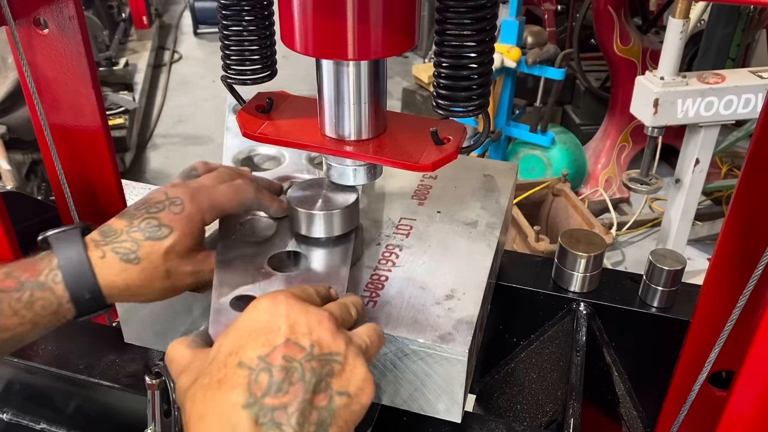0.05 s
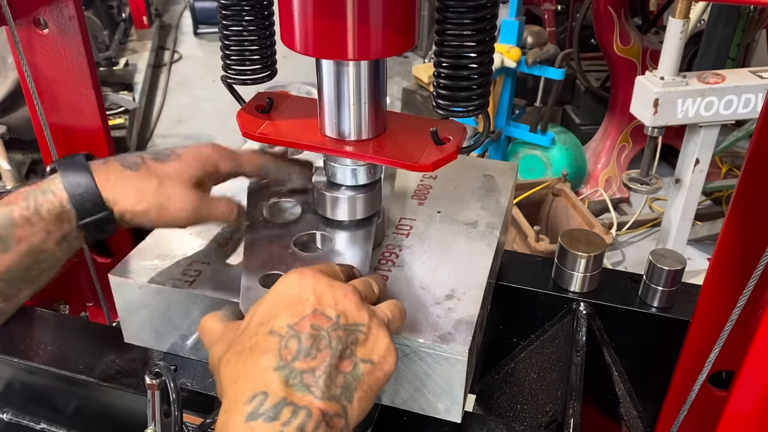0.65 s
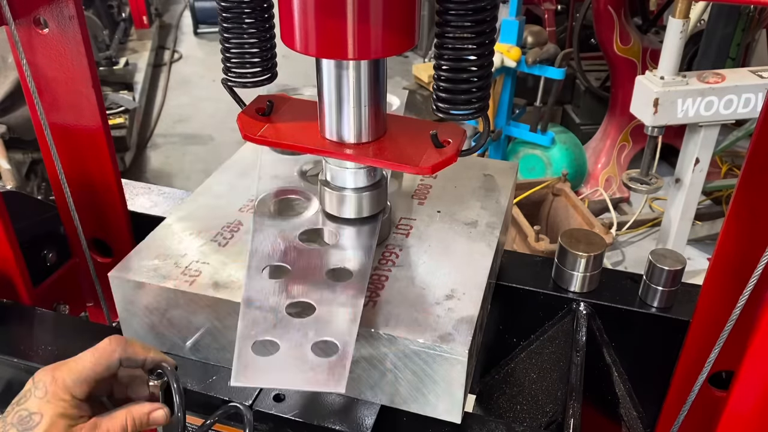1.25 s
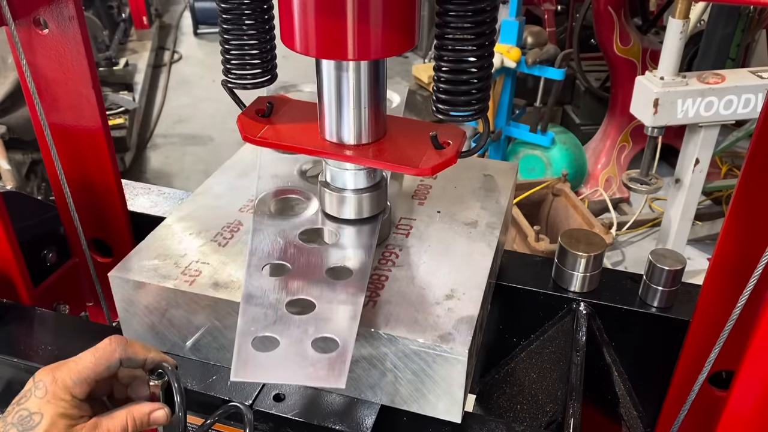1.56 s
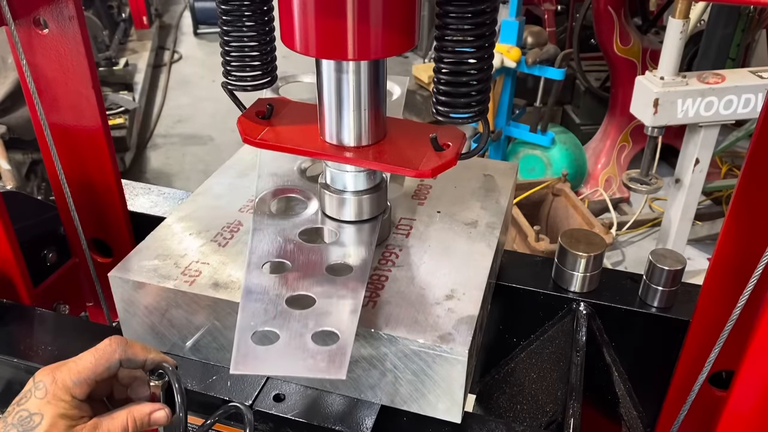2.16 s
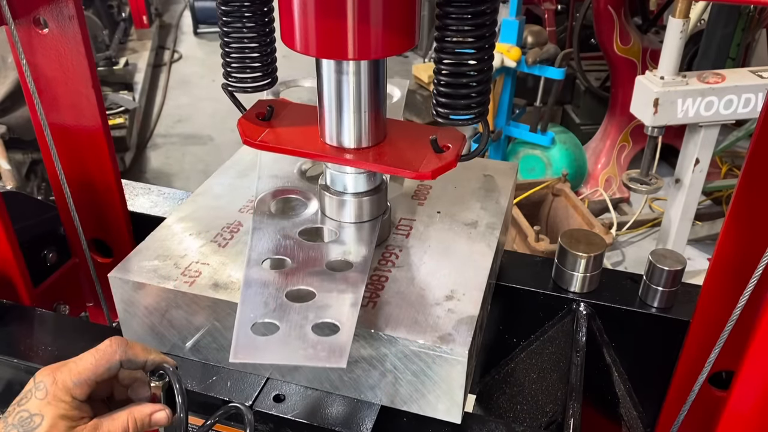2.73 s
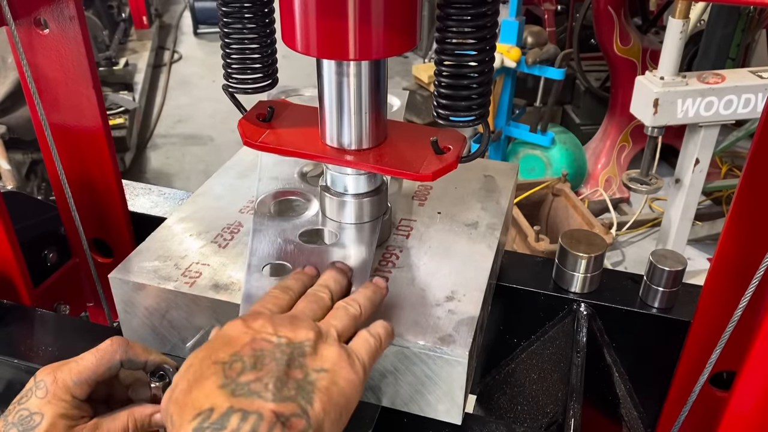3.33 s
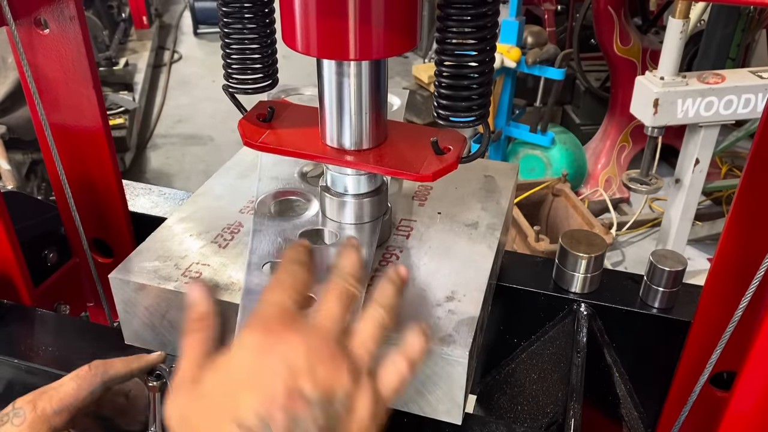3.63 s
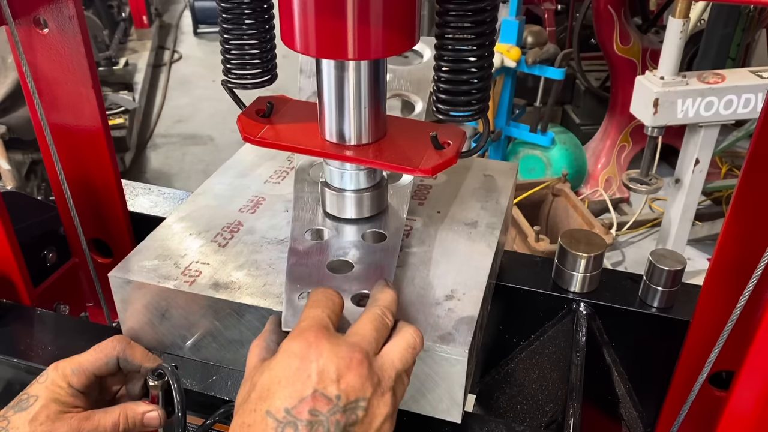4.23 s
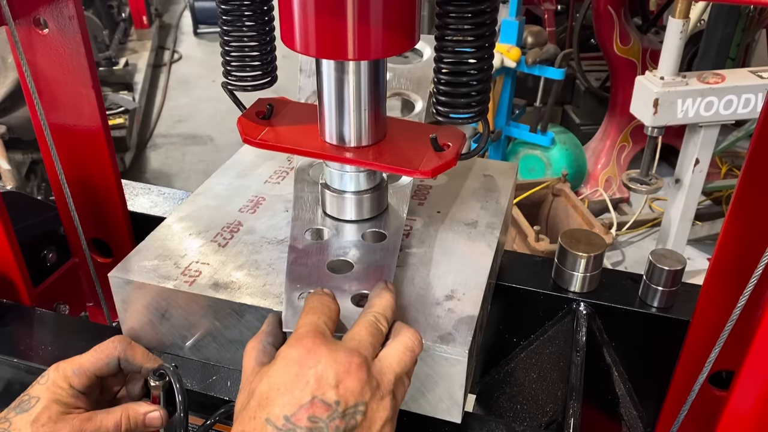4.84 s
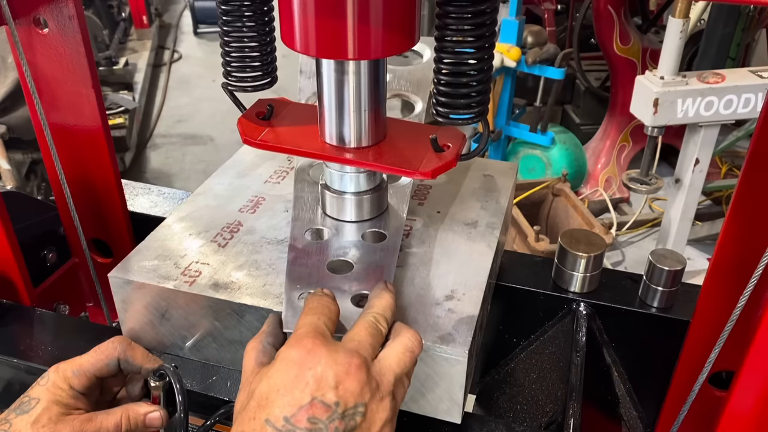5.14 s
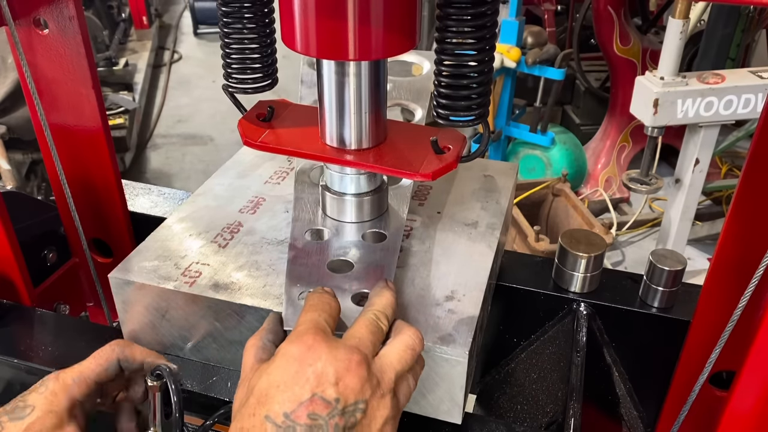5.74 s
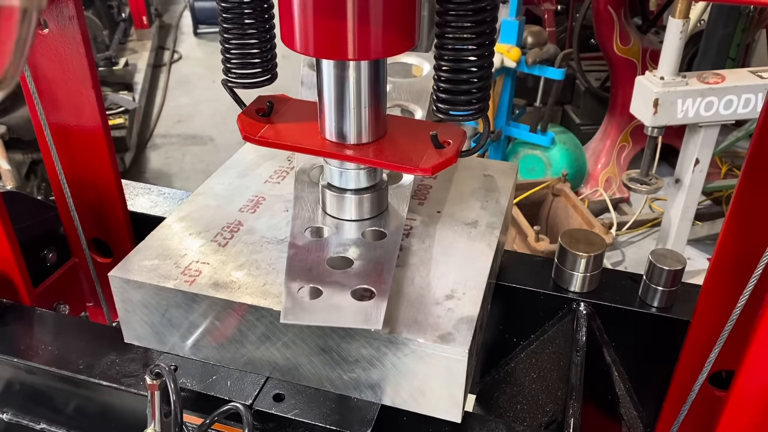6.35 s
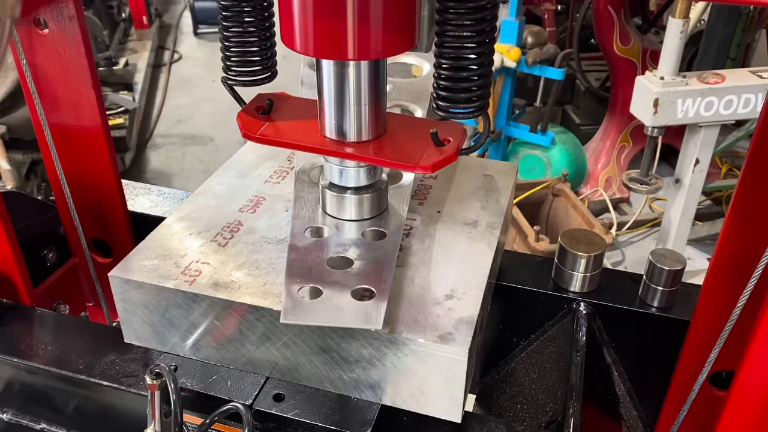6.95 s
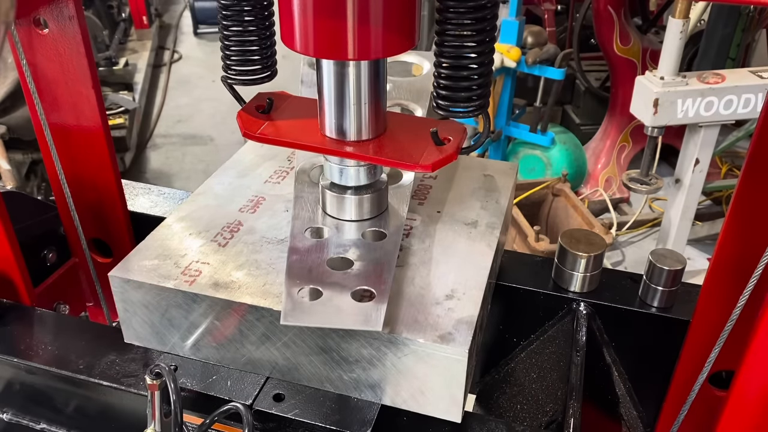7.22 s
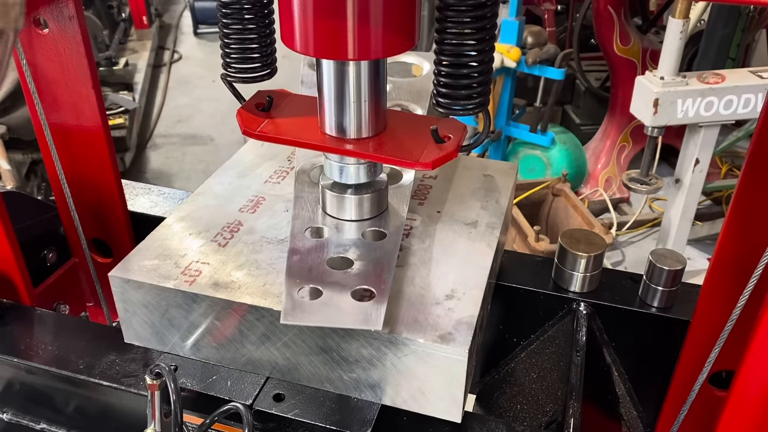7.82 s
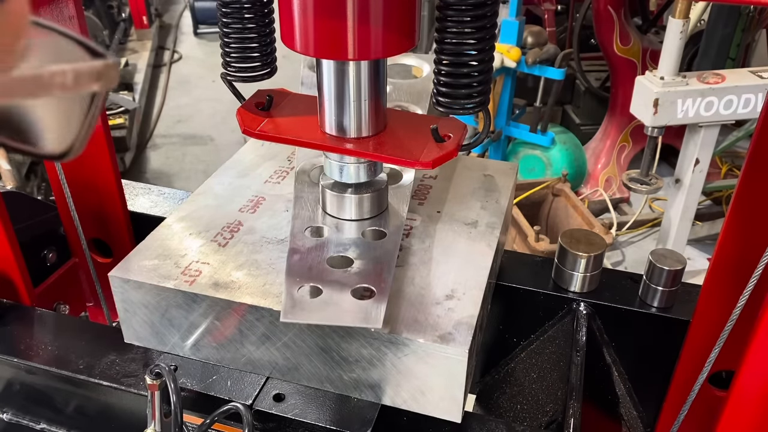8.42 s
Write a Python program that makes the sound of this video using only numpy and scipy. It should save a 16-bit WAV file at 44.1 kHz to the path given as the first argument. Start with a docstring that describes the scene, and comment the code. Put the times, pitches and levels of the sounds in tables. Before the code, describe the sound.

A steel die clinks close by in a workshop, over a low fan rumble. An air-driven hydraulic pump then runs twice, about two seconds each time, in a rapid rattle of knocks, valve clacks and hissing exhaust puffs slightly to the left. Each run slows as the press takes load, with a short room echo. Afterwards the fan remains, with a few dull bumps and a very faint whistle of oil.

```python
"""A workshop, in stereo, close to a hydraulic press, with a fan rumbling and whining behind it.
A steel die clinks under the ram, then an air-driven pump runs twice, slowing as the load builds.
Each stroke knocks the pump body, rings its casing, clacks an oil valve and lets out a puff of exhaust
air, a little left of centre, that echoes through the shop. Dull bumps come now and then, and the level
dips briefly three times. Afterwards oil whistles faintly through the release valve as the ram returns."""
import sys
import numpy as np
from scipy import signal
from scipy.fft import rfft, irfft, next_fast_len
from scipy.io import wavfile

SR = 44100
rng = np.random.default_rng(int(sys.argv[2]) if len(sys.argv) > 2 else 0)


def unload_audio(sound):
    """Save the sound as a 16-bit wav file, at the path given as the first command line argument."""
    columns = np.transpose(np.atleast_2d(sound))
    # keep every value between -1 and 1, then stretch to whole-number steps
    steps = np.round(np.clip(columns, -1, 1) * 32767)
    wavfile.write(sys.argv[1], SR, steps.astype(np.int16))


N = 373957


def undb(db):
    """Decibels to gain."""
    return 10 ** (np.asarray(db) / 20)


def unit(x):
    """Scale to rms 1."""
    return x / np.sqrt(np.mean(x ** 2))


def clock(seconds=N / SR):
    """Sample times in seconds."""
    return np.arange(int(round(seconds * SR))) / SR


def add(out, s, sound):
    """Mix a sound, or a single impulse, in at time s."""
    i, sound = int(s * SR), np.atleast_1d(sound)
    out[..., i:i + sound.shape[-1]] += sound[..., :N - i]


def convolve(x, response):
    """Pass a sound through a response of one or two channels."""
    return signal.oaconvolve(np.atleast_2d(x), np.atleast_2d(response), axes=-1)[:, :N]


def cut(x, kind, hz, order=2):
    """Butterworth lowpass or highpass."""
    return signal.sosfilt(signal.butter(order, hz, kind, fs=SR, output="sos"), x)


def curve(points, size):
    """Join (f/Hz, value) points on a log-frequency axis, one value per FFT bin."""
    hz, values = np.transpose(points)
    return np.interp(np.log(np.fft.rfftfreq(size, 1 / SR) + 1), np.log(hz), values)


def colour(points, peaks=(), size=4096):
    """Minimum-phase response of unit energy with the given spectrum and resonant peaks."""
    f = np.fft.rfftfreq(size, 1 / SR)
    lift_db = sum(db / (1 + (2 * (f - hz) / width) ** 2) for hz, width, db in peaks)
    cepstrum = irfft(np.log(undb(curve(points, size) + lift_db)))
    cepstrum[1:size // 2] *= 2
    cepstrum[size // 2 + 1:] = 0
    response = irfft(np.exp(rfft(cepstrum)))
    return response / np.linalg.norm(response)


def ring(modes, seconds, ratio=1):
    """Modes struck once, unit energy; mode k is weighted ratio ** k, so a negative ratio alternates."""
    t = clock(seconds)
    y = sum(ratio ** k * undb(db - 60 * t / t60) * np.sin(2 * np.pi * hz * t)
            for k, (hz, db, t60) in enumerate(modes))
    return y / np.linalg.norm(y)


def noise(side_db):
    """Mid-side white noise; more side makes it wider."""
    mid, side = rng.standard_normal((2, N))
    return unit(mid + undb(side_db) * np.array([side, -side]))


def tone(hz, width_hz):
    """A wavering tone: a band of noise, rms 1."""
    size = next_fast_len(N)
    f = np.fft.rfftfreq(size, 1 / SR)
    band = rfft(rng.standard_normal(size)) / (1 + (2 * (f - hz) / width_hz) ** 2)
    return unit(irfft(band, size)[:N])


def reflections(t60_low, t60_high, gap_s):
    """Dense echoes of unit energy at each microphone, with separate decays below and above 8 kHz."""
    t = clock(.7)
    echoes = rng.standard_normal((2, len(t)))
    low = cut(echoes, "lowpass", 8000) * undb(-60 * t / t60_low)
    high = cut(echoes, "highpass", 8000) * undb(-60 * t / t60_high)
    tail = (low - high) * (1 - np.exp(-(t / gap_s) ** 2))
    return tail / np.linalg.norm(tail, axis=1, keepdims=True)


def pan(x, left_db):
    """Make a sound louder at the left microphone than at the right."""
    return x * undb(np.array([[1], [-1]]) * left_db / 2)


def place(x, levels, phases):
    """Give a sound level and phase differences between the microphones that vary with frequency."""
    size = next_fast_len(N)
    half = np.sqrt(undb(curve(levels, size))) * np.exp(.5j * curve(phases, size))
    return irfft(rfft(x, size) * np.array([half, 1 / half]), size)[:, :N]


def air(spectrum, since_s, rumble_db, hiss_db, rumble_db_per_s=1.5, hiss_db_per_s=1.8):
    """Fan-stirred air: a buffeting, central rumble under a wide hiss; both grow slowly from since_s."""
    t = clock() - since_s
    rumble = cut(convolve(noise(side_db=-10), colour(spectrum)), "lowpass", 350)
    hiss = cut(convolve(noise(side_db=-2.5), colour(spectrum)), "highpass", 376)
    hiss = cut(hiss, "lowpass", 10300, order=10)
    buffet_db = tone(3.2, 26)
    return (unit(rumble) * undb(rumble_db + rumble_db_per_s * t + buffet_db)
            + unit(hiss) * undb(hiss_db + hiss_db_per_s * t))


# room tone before, during and after the pumping: f/Hz, relative level/dB
AIR_BEFORE = [(12, -43), (20, -13), (66, -2.5), (114, -5), (179, -20), (463, -15.5), (969, -22),
              (1370, -18.5), (1690, -24.5), (2200, -24), (8010, -36), (9390, -36), (11000, -54),
              (14300, -91), (22000, -120)]
AIR_DURING = [(25, -41), (42, -18), (65, -13), (130, 5), (250, -6), (400, -8), (900, -10.5), (1500, -18),
              (2300, -20), (2750, -18.5), (3300, -21.5), (8000, -30), (15000, -35)]
AIR_AFTER = [(12, -24), (20, -18), (66, -7.5), (124, -13), (239, -28.5), (303, -20), (375, -24.5),
             (406, -20.5), (944, -29), (1240, -27.5), (1370, -22.5), (1690, -33), (1900, -31),
             (2900, -33.5), (3500, -36.5), (6150, -38.5), (11000, -47), (14300, -100), (22000, -120)]
# fan and motor tones, centred between the microphones: f/Hz, width/Hz, level/dB
FAN_WHINE = [(1353, 9, -71.5), (1397, 30, -67)]
MOTOR_HUM = [(67.3, 3.6, -56.5), (132.3, 31, -49.5), (233.3, 6.6, -53), (2650, 20, -75), (2805, 62, -68)]


def workshop(during_db=-49, early_whine_db=6):
    """Behind the press: fan rumble and whine; the scene changes at the first and at the last dip, with motor
    hum in place of the fan between them."""
    t = clock()
    whine = sum(undb(db) * tone(hz, width) for hz, width, db in FAN_WHINE)
    hum = sum(undb(db) * tone(hz, width) for hz, width, db in MOTOR_HUM)
    during = hum + undb(during_db) * convolve(noise(side_db=-7), colour(AIR_DURING))
    before = air(AIR_BEFORE, 0, rumble_db=-39.5, hiss_db=-47.5) + undb(early_whine_db) * whine
    after = air(AIR_AFTER, DIPS[-1], rumble_db=-46.5, hiss_db=-56) + whine
    return np.where(t < DIPS[0], before, np.where(t > DIPS[-1], after, during))


def late_hiss(start_s=7.68, rise_s=.44, level_db=-58):
    """A wide background hiss, strongest around 900 Hz, swells near the end."""
    band = colour([(400, -31.5), (900, 6), (1500, -6), (2900, -3),
                   (4200, -13), (9000, -26), (12000, -58)])
    rise = np.clip((clock() - start_s) / rise_s, 0, 1)
    return undb(level_db) * rise * convolve(noise(side_db=-3), band)


# soft low bumps in the shop: t/s, level/dB, mean f/Hz
BUMPS = [(0.666, -27.5, 61), (0.997, -25.5, 61.6), (1.694, -27, 159.7), (3.891, -31, 160),
         (3.948, -29.5, 144), (4.54, -29.5, 152), (4.68, -25, 136), (5.848, -35.5, 173),
         (6.105, -31.5, 195), (6.138, -31.5, 143), (6.308, -36, 75), (7.026, -31.5, 109), (8.199, -40, 150)]


def bumps(length_s=.0387, thud_db=-3, rustle_db=-2, sag=.51):
    """Dull bumps: a few low cycles that sink in pitch, with a soft rustle."""
    thuds, touch = np.zeros((2, N))
    t = clock(length_s)
    for s, db, hz in BUMPS:
        swell = undb(db) * np.sin(np.pi * t / length_s)
        turns = hz * t * (1 + sag * (1 - t / length_s))
        add(thuds, s, swell * np.sin(2 * np.pi * turns))
        add(touch, s, swell * hz ** 2 / (hz ** 2 + 130 ** 2))  # higher bumps rustle more
    band = colour([(40, -16), (110, 2.5), (220, 3), (500, -10), (800, -37), (3000, -50), (12000, -70.5)])
    rustle = convolve(noise(side_db=-9.5), band)
    return undb(thud_db) * thuds + undb(rustle_db) * touch * rustle


# faint oil whistles, dead centre: start t/s, end t/s, f/Hz, width/Hz, level/dB
WHISTLES = [(6.2, 6.85, 6180, 110, -69), (6.6, 7.8, 4880, 160, -75), (5.6, 7.9, 5250, 550, -73),
            (7.55, 8.12, 4700, 620, -68)]


def release_valve():
    """Oil squeezes back through the valve as the springs lift the ram; each whistle swells and fades."""
    t, out = clock(), np.zeros(N)
    for start, end, hz, width, db in WHISTLES:
        from_middle = (2 * t - start - end) / (end - start)
        arch = np.sqrt(np.clip(1 - from_middle ** 2, 0, 1))
        out += undb(db) * arch * tone(hz, width)
    return out


# the die meeting the ram, nearest the microphones: t/s, level/dB, contact decay/s
CLINKS = [(0.5697, -18.5, 0.0014), (0.574, -33, .002), (0.5783, -36, .002), (.5865, -42, .002)]
# modes of the die and plate: f/Hz, relative level/dB, t60/s
DIE_MODES = [(1051, -13, 0.065), (1224, -3, .07), (1400, -16, .06), (1930, -10, 0.099), (3080, -1, 0.076),
             (3418, -22, 0.073), (3887, -3, .034), (4260, 2, 0.037), (5040, -8, .018), (5496, -10, .05),
             (6336, 2, 0.032), (6640, -4, .025), (7160, -7, .035)]
# crack of contact and bright scrape: f/Hz, relative level/dB
CRACK = [(200, -26), (450, -14), (1100, 3), (2000, 2), (4300, 4), (6800, -1.5), (8800, -11), (10300, -5),
         (12000, -35), (16000, -36)]
SCRAPE = [(1000, -22), (4600, -15), (5200, -7), (5480, 3), (5750, -6), (6400, -5), (7200, -12),
          (10000, -32), (14000, -60)]


def die(ring_db=17, scrape_at_s=.622, scrape_length_s=.028, scrape_db=-45):
    """Steel knocks on steel, chatters and slides home."""
    contact, blows, slide = np.zeros((3, N))
    t = clock(.06)
    for s, db, decay_s in CLINKS:
        add(contact, s, undb(db) * np.exp(-t / decay_s))
        add(blows, s, undb(db))
    add(slide, scrape_at_s, undb(scrape_db) * np.hanning(int(scrape_length_s * SR)))
    grit = noise(side_db=-8)
    crack = convolve(contact * grit, colour(CRACK))
    scrape = convolve(slide * grit, colour(SCRAPE))
    scatter = convolve(crack, reflections(t60_low=.11, t60_high=.027, gap_s=.00099))
    ringing = cut(convolve(blows, ring(DIE_MODES, .4)), "lowpass", 9700)
    return crack + scrape + scatter + undb(ring_db) * ringing


# modes of the pump casing, toward the left microphone: f/Hz, relative level/dB, t60/s
CASING_MODES = [(802, -8, .4), (829, 0, .15), (866, -14, .1), (1168, -9, .22), (1195, -4, .16),
                (1222, -12, .12)]


def casing(events, free_db=-14.3, load_db=-10, strain_load=.018, rise=.018, fall=.14, scatter=.012):
    """Strokes ring the casing, loudest when a multiple of their rate meets a note; strain bends it."""
    out = np.zeros(N)
    t, note = clock(.4), ring(CASING_MODES, .4, ratio=-1.07)
    for s, load in events:
        waver, force_db = rng.standard_normal(2)
        strain = np.clip(load / strain_load, 0, 1) ** 2
        pitch = 1 + strain * (rise - fall * load + scatter * waver)
        bent = np.interp(t * pitch, t, note, right=0)
        add(out, s, undb(free_db + load_db * load + force_db) * bent)
    return pan(out, left_db=4.5)


def pressure_pulse(points, spread_s=.0045, size=2048):
    """A pulse of unit energy, centred in its length and spread by the steel: low notes travel slower."""
    hz = np.fft.rfftfreq(size, 1 / SR)
    turns = spread_s * (2 * np.sqrt(300 * hz) - hz)
    spectrum = undb(curve(points, size)) * np.exp(-2j * np.pi * turns)
    pulse = np.fft.fftshift(irfft(spectrum)) * np.hanning(size)
    return pulse / np.linalg.norm(pulse)


LABOUR_LOAD, WANDER_S = .07, .0007  # load at which the knock has fully changed; jitter per unit load
# piston knock, running free and against high oil pressure: f/Hz, relative level/dB
FREE_KNOCK = [(45, -52), (108, -14), (144, -3), (180, -6), (216, -10), (252, 0.5), (288, 2.5), (324, -3),
              (360, -7), (432, -5), (468, -14), (504, -7), (540, -17), (660, -25.5), (760, -34.5),
              (1050, -47), (1700, -21), (3000, -23), (8000, -56)]
LOADED_KNOCK = [(45, -44.5), (90, -16), (140, 2.5), (195, -9), (245, -0.5), (282, 1.5), (335, -12),
                (395, -1), (450, -13), (515, -7), (580, -24), (760, -32), (3000, -45), (8000, -64)]
# modes of the pump body and the press frame: f/Hz, relative level/dB, t60/s
BODY_MODES = [(1286, 0, 0.057), (1358, 2.5, 0.054), (1418, 7.5, 0.08), (2680, 6.5, 0.1)]
FRAME_MODES = [(143, -7, .12), (245, -0.5, .17), (284, 1.5, 0.16), (400, 0.5, 0.1), (512, -2.5, .08)]


def piston(events, free_db=-7, loaded_db=-9.5, frame_db=-11, body_db=-14, body_load_db=-20,
           recoil_s=.0079, recoil=.36, lag_s=.004):
    """The piston thumps, recoils and rings the body; under load the recoil fades and the frame drones."""
    free, loaded, rattle = np.zeros((3, N))
    for s, load in events:
        jitter, force_db, scatter_db = rng.standard_normal(3)
        s += WANDER_S * load * jitter
        blow = undb(.54 * force_db)
        labour = np.clip(load / LABOUR_LOAD, 0, 1)
        add(free, s, blow * (1 - labour))
        add(free, s + recoil_s, -blow * (1 - labour) * recoil * undb(scatter_db))
        add(loaded, s, blow * labour * undb(.91 * scatter_db))
        add(rattle, s, blow * undb(body_load_db * load))
    free_pulse, loaded_pulse = pressure_pulse(FREE_KNOCK), pressure_pulse(LOADED_KNOCK)
    thump = undb(free_db) * convolve(free, free_pulse) + undb(loaded_db) * convolve(loaded, loaded_pulse)
    thump = np.roll(thump, int(lag_s * SR) - len(free_pulse) // 2, axis=1)  # centred lag_s after the blow
    drone = undb(frame_db) * convolve(loaded, ring(FRAME_MODES, .3))
    body = undb(body_db) * convolve(rattle, ring(BODY_MODES, .28))
    return cut(thump + drone + body, "highpass", 70)


# clack of the oil valve, near the centre: f/Hz, relative level/dB
CLACK = [(300, -27), (580, 0), (950, -4.5), (1100, -18.5), (1300, -1.5), (1700, -3), (2300, 2.5), (2650, 1),
         (3000, 1), (4000, -6.5), (6000, -6.5), (10000, -35)]


def oil_valve(events, clack_db=-10, load_db=10, shut_s=.0105, late_s=.034, ring_db=-11):
    """The valve clacks shut after each blow; under load it shuts later and harder and rings the body."""
    clacks, slams = np.zeros((2, N))
    for s, load in events:
        force_db, jitter = rng.standard_normal(2)
        when = s + shut_s + load * (late_s + WANDER_S * jitter)
        add(clacks, when, undb(clack_db + load_db * load + force_db))
        add(slams, when, undb(ring_db + force_db) * np.clip(load / LABOUR_LOAD, 0, 1))
    mid, side = reflections(t60_low=.12, t60_high=.059, gap_s=.000291)  # dense metallic ring
    clack = convolve(colour(CLACK), mid + undb(-14) * np.array([side, -side]))
    return convolve(clacks, clack) + convolve(slams, ring(BODY_MODES, .28))


# air leaking as the valve opens, just before each run: t/s, length/s, level/dB
LEAKS = [(1.283, 0.047, -37), (3.827, 0.054, -28.5)]


def exhaust_port(events, lag_s=.00038, open_s=.0011, vent_s=.015, spit_s=.0053,
                 puff_db=-20.5, load_db=7, seep_db=-12.5, spit_db=-4):
    """Envelopes of airflow and spit: the port snaps open, the cylinder empties, and some air seeps on."""
    power, spit = np.zeros((2, N))
    t = clock(.045)
    seep = undb(puff_db + seep_db) ** 2 * np.hanning(len(t))
    spit_shape = np.sqrt(t / spit_s) * np.exp((1 - (t / spit_s) ** 2) / 4)
    for s, load in events:
        fill, stickiness, sharpness = rng.standard_normal(3)
        # under load the cylinder fills to a higher pressure: it opens faster and vents harder
        pressure = undb(puff_db + load_db * load + .36 * fill)
        opening = 1 - np.exp(-t / (open_s * np.exp(.22 * stickiness - 2 * load)))
        emptying = np.exp(-(t / vent_s) ** 2 * (1 + load) / 2)
        add(power, s + lag_s, (pressure * opening * emptying) ** 2 + seep)
        add(spit, s + lag_s, pressure * undb(spit_db + 1.6 * sharpness + 4.5 * load) * spit_shape)
    for s, length, db in LEAKS:
        add(power, s, undb(db) ** 2 * signal.windows.tukey(int(length * SR), .7))
    return np.sqrt(power), spit


# exhaust hiss, and the bright spit as the port first opens: f/Hz, relative level/dB
HISS = [(40, -54.5), (200, -20.5), (600, -19.5), (1100, -17.5), (1350, -12.5), (1700, -12), (2200, -9),
        (2600, -7), (3000, -10), (3400, -4), (3800, -4), (4250, -6), (4650, -5), (5200, -5.5), (6600, -4),
        (7500, -6), (9600, -4), (11600, -6.5), (12500, -8), (14100, -5.5), (15500, -10)]
SPIT = [(1500, -47), (5000, -10.5), (7000, 2), (8200, 0), (10500, -2), (12500, -22), (15500, -15.5)]
# muffler resonances: f/Hz, width/Hz, lift/dB
MUFFLER = [(2285, 59, 1), (2674, 70, 2.5), (3896, 225, 5), (4580, 160, 5), (6220, 93, 2.5), (7030, 64, 3),
           (7370, 150, 4.5), (7800, 60, 4.5), (7740, 61, 3.5), (8420, 76, 6), (9320, 90, 5), (9570, 80, 4),
           (10430, 81, 2.5), (11530, 170, 4), (13400, 100, 4)]
# steel parts that ring on when the pump stops: f/Hz, relative level/dB, t60/s
STEEL_MODES = [(2690, 1.5, .22), (2800, -3, .3), (3348, -4, .33), (3400, -10, .2)]
# left microphone minus right, before the overall pan: f/Hz, level/dB
EXHAUST_BALANCE = [(700, 3.5), (1400, -7.5), (2400, -2), (3300, -7), (3900, -2.5), (5000, 1), (7000, -1.5),
                   (11500, 0), (13000, -2.5)]
# lead at the left microphone: f/Hz, phase/rad
EXHAUST_PHASE = [(0, 0), (950, -1), (1460, -0.1), (2500, -1.68), (4570, -0.2), (5940, 1.46), (7060, 0.78),
                 (7750, 1.3), (8350, 0.5), (9560, 0.7), (11500, -0.4), (13100, 0.93), (15400, -1.5),
                 (16200, -1.44)]


def exhaust(events, steel_db=-27, scatter_db=-13.5):
    """Turbulent puffs hiss through the muffler and ring steel parts; the frame close by scatters them."""
    flow, spit = exhaust_port(events)
    turbulence = undb(.57 * tone(160, 496))
    hiss = convolve(flow * turbulence * noise(side_db=-5), colour(HISS, MUFFLER))
    hiss += undb(steel_db) * convolve(hiss, ring(STEEL_MODES, .5))
    hiss += convolve(spit * noise(side_db=-6.5), colour(SPIT, MUFFLER))
    hiss = place(hiss, EXHAUST_BALANCE, EXHAUST_PHASE)
    scatter = convolve(hiss, reflections(t60_low=.11, t60_high=.017, gap_s=.00049))
    return pan(hiss + undb(scatter_db) * scatter, left_db=2.74)


def strokes(start, stop, start_hz, bite, free_hz=36, sag_hz_per_s=.3956, bite_s=.0683, stall_s=2.6977):
    """Time and load (share of free speed lost) of each stroke; the pump slows more once the die bites."""
    t = start + clock(stop - start)
    pressing_s = bite_s * np.logaddexp(0, (t - bite) / bite_s)  # time since the bite, eased in
    rate_hz = (start_hz - sag_hz_per_s * (t - start)) * np.exp(-pressing_s / stall_s)
    turns = np.cumsum(rate_hz) / SR
    whole = np.arange(int(turns[-1]) + 1)
    return np.transpose([np.interp(whole, turns, t), np.interp(whole, turns, 1 - rate_hz / free_hz)])


# the two pump runs: start t/s, stop t/s, starting stroke rate f/Hz, die bites t/s
RUNS = [(1.3103, 3.55, 36.593, 2.8065), (3.8591, 5.78, 36.016, 5.464)]


def pump():
    """The air-driven pump: exhaust, piston, casing and oil valve all follow the same strokes."""
    events = np.vstack([strokes(*run) for run in RUNS])
    return exhaust(events) + piston(events) + casing(events) + oil_valve(events)


def scene(pump_room_db=-12, die_room_db=-16):
    """Pump and die echo in the workshop over its background; the die is closer and drier."""
    pumping, clink = pump(), die()
    sent = cut(undb(pump_room_db) * pumping + undb(die_room_db) * clink, "highpass", 230)
    room = convolve(sent, reflections(t60_low=.36, t60_high=.47, gap_s=.013))
    return pumping + clink + room + bumps() + workshop() + late_hiss() + release_valve()


# brief dips in level at both microphones: t/s
DIPS = [1.287, 3.824, 6.295]


def record(dry, fade_out_s=.035, fade_in_s=.0032, top_hz=15850):
    """The level dips briefly three times, and the top treble is cut steeply."""
    t, gain = clock(), np.ones(N)
    for s in DIPS:
        gain *= np.clip(np.maximum((s - t) / fade_out_s, (t - s) / fade_in_s), .05, 1)
    return signal.sosfilt(signal.ellip(10, .2, 80, top_hz, fs=SR, output="sos"), dry * gain)


dry = scene()
out = record(dry)
unload_audio(out)
```